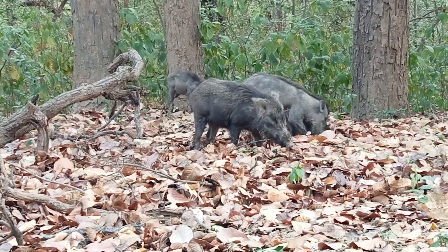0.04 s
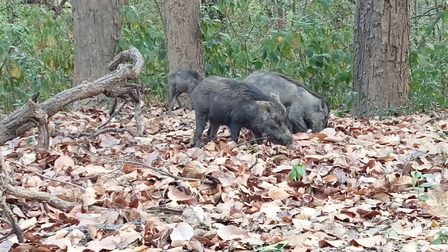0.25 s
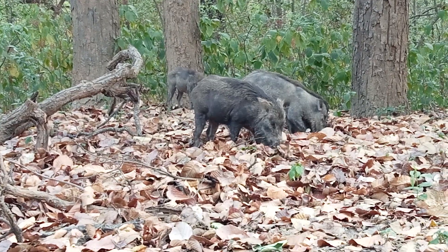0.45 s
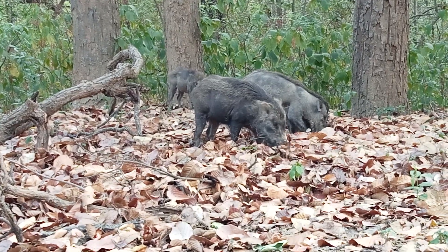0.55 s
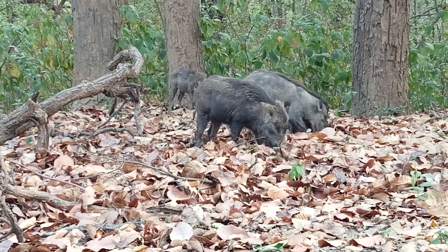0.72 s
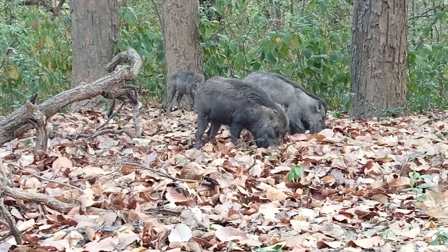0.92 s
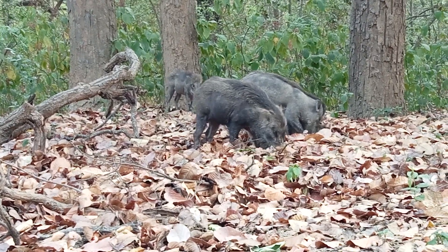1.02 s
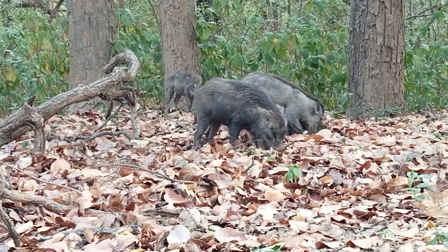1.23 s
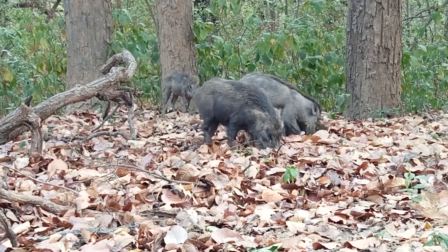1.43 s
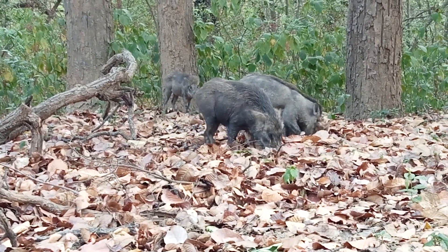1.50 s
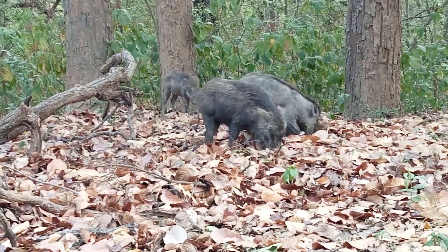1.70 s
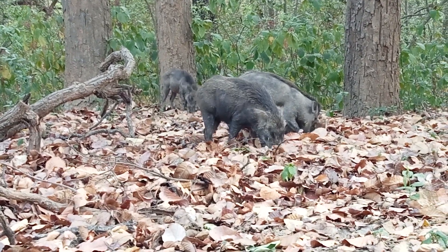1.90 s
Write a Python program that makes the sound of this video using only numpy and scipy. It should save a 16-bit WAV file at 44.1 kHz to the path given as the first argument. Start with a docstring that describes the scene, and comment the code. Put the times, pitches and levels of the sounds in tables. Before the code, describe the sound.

Dry leaves rustle and small twigs snap throughout as wild boars root several metres away, with surges at about 0.5 and 0.9 seconds. From 0.6 seconds one boar whines thinly, then gives a short falling squeal from 1.1 to 1.3. Soft thuds fall at 0.2 and 1.1 seconds. Lighter rustling continues to the end, with very faint distant hoots near the start and around 1.6, over a quiet forest hum.

```python
"""Dry leaves rustle and twigs snap: wild boars are rooting on a forest floor several metres away.
Their snouts shove the litter into bursts of crackle and scuff the soil, and two dull thuds sound.
One boar whines thinly, then gives a short falling squeal, its harmonics shaped by the throat.
Faint far hoots sit over the quiet hum of the forest; trunks and undergrowth add a short tail."""
import sys
import numpy as np
from scipy import signal
from scipy.io import wavfile
from scipy.ndimage import uniform_filter1d

SR = 44100
rng = np.random.default_rng(int(sys.argv[2]) if len(sys.argv) > 2 else 0)


def master_out(mix):
    """Clip the mix to full scale and print it as 16-bit PCM to the path in sys.argv[1]."""
    frames = np.transpose(np.atleast_2d(mix))
    ceiling = np.clip(frames, -1, 1)
    pcm = np.round(ceiling * 32767).astype(np.int16)
    wavfile.write(sys.argv[1], SR, pcm)


N = 85995
T = np.arange(N) / SR


def from_db(db):
    return 10 ** (np.asarray(db) / 20)


def unit_rms(x):
    return x / np.sqrt(np.mean(x ** 2) + 1e-20)


def automation(rows):
    """One curve per column after the time, interpolated at every sample."""
    times, *columns = np.transpose(rows)
    return [np.interp(T, times, column) for column in columns]


def eq_db(points, hz):
    """An EQ curve read on a log-frequency axis."""
    freqs, db = np.transpose(points)
    return np.interp(np.log(hz), np.log(freqs), db)


def drift(rate_hz):
    """A smooth random modulator with an RMS of 1."""
    r = np.exp(-2 * np.pi * rate_hz / SR)
    return unit_rms(signal.lfilter([1], [1, -2 * r, r * r], rng.standard_normal(2 * N))[N:])


def band(x, low, high):
    sos = signal.butter(2, [low, min(high, .48 * SR)], "band", fs=SR, output="sos")
    return signal.sosfilt(sos, x)


def resonate(x, hz, width):
    """A resonant band-pass with unity gain at its peak."""
    r = np.exp(-np.pi * width / SR)
    feedback = [1, -2 * r * np.cos(2 * np.pi * hz / SR), r * r]
    return signal.lfilter(np.array([1, 0, -1]) * (1 - r * r) / 2, feedback, x + 1e-18)


def decay(start, t60):
    """An envelope that jumps to 1, then falls 60 dB every t60 seconds."""
    return (T >= start) * np.exp(-np.log(1000) * np.clip((T - start) / t60, 0, 10))


def attack_decay(start, attack, t60):
    """A linear rise into an exponential fade."""
    top = start + attack
    return np.clip((T - start) / attack, 0, 1) * np.maximum(T < top, decay(top, t60))


def third_octaves():
    """Bands as (low, centre, high) in Hz."""
    edges = 25 * 2 ** (np.arange(29) / 3)
    return list(zip(edges, np.sqrt(edges[:-1] * edges[1:]), edges[1:]))


def leaf_contacts(crackles_per_s=2200, ticks_per_s=70):
    """Two raw textures of leaf on leaf: dense crackle, scattered ticks and a rubbing hiss."""
    triggers = rng.random(N) < crackles_per_s / SR
    crackles = triggers * from_db(np.minimum(rng.exponential(1, N), 4))
    ticks = from_db(15) * (rng.random(N) < ticks_per_s / SR) * rng.standard_normal(N)
    textures = []
    for _ in range(2):
        crackle = unit_rms(woods(crackles * rng.standard_normal(N), wet_db=-3))
        rub = from_db(4.5) * rng.standard_normal(N)
        textures.append(ticks + crackle + rub)
    return textures


# Fader ride of the steadily stirred litter: t/s, level/dB
LITTER_STIR = [(0,-59),(.1,-60.5),(.14,-56),(.25,-53.5),(.3,-60.5),(.38,-59.5),(.45,-51.5),(.62,-55),(.72,-49.5),(.81,-49),(.85,-46),(.89,-42.5),(.95,-43),(1.07,-52),(1.17,-51),(1.29,-56),(1.4,-56),(1.68,-54.5),(1.85,-57.5),(1.95,-63)]
# Quick shoves of a snout or hoof: t/s, level/dB, T60/s, tilt/(dB per octave)
SNOUT_SHOVES = [(0.153,-55.5,0.048,0),(0.399,-49,0.074,1.5),(0.419,-47,0.16,-2.5),(0.5,-42.5,0.25,1.4),(.885,-44.5,0.41,2),(1.426,-52,0.34,0),(1.465,-49,0.17,-2),(1.51,-61.5,0.089,-11),(1.636,-53,0.47,-2.5)]
# Tone of the dry leaves: f/Hz, gain/dB
LEAF_EQ = [(150,-7),(400,-6),(700,-7),(950,-9.5),(1500,-6.5),(2200,-3.5),(3300,-0.5),(4600,-1.5),(6600,0),(8200,-14),(10000,-19.5),(13500,-19.5),(16000,-15.5)]
# Narrow resonances in the rustle: f/Hz, width/Hz, boost/dB
LEAF_RESONANCES = [(774,94,4.5),(1523,53,8),(1992,145,8),(2477,48,8.5),(2755,73,7.5),(3316,25.5,8),(4577,88,9),(6830,81,8.5)]


def rustle(attack_s=0.012, tilt_pivot_hz=4400, flicker_db=0.61):
    """Dry leaves crackle and rub as they are stirred, surging with each shove."""
    contacts = leaf_contacts()
    stir = from_db(automation(LITTER_STIR)[0])
    shoves = [(from_db(db) * attack_decay(start, attack_s, t60), tilt)
              for start, db, t60, tilt in SNOUT_SHOVES]
    shared_flicker = drift(21)
    shaped, steady = 0, 0
    for k, (low, hz, high) in enumerate(third_octaves()[7:], start=7):  # from 126 Hz up
        flicker = flicker_db * (shared_flicker + drift(27)) / np.sqrt(2)
        grain = band(contacts[k % 2], low, high) * from_db(eq_db(LEAF_EQ, hz) + flicker)
        octaves = np.clip(np.log2(hz / tilt_pivot_hz), -1, 2)
        power = stir ** 2 + sum((push * from_db(tilt * octaves)) ** 2 for push, tilt in shoves)
        shaped += grain * np.sqrt(power)
        steady += grain
    leaves = shaped / np.std(steady)
    ring = sum((from_db(db) - 1) * resonate(leaves, hz, width) for hz, width, db in LEAF_RESONANCES)
    return from_db(-2.5) * (leaves + ring)


# Leaves and twigs breaking: t/s, peak/dB, f/Hz, width/Hz, T60/s
TWIG_SNAPS = [(.107,-51,2730,2000,.013),(0.16,-45,3000,5050,0.018),(.228,-49,5070,4000,.013),(.401,-33,4140,3970,0.014),(.421,-41,5400,3980,0.015),(.426,-42,4440,3800,.012),(0.444,-54,2500,2400,0.008),(0.7533,-39.5,14100,2300,0.0039),(.7537,-36,3300,4000,.012),(0.794,-42,2520,1500,.005),(.7955,-49,14300,2420,0.0035),(0.846,-32,4330,3000,0.015),(.895,-31,5200,4000,.006),(1.2159,-33,5640,2320,0.0077),(1.225,-48,5770,2400,0.01),(1.329,-47,4400,3020,0.011),(1.448,-45,3800,4000,0.0071),(1.469,-38.5,3030,4040,0.015),(1.479,-45,3500,4000,0.011),(1.487,-52,5000,4000,0.004),(1.516,-43,3960,4000,.013),(1.596,-46,2800,2000,0.0065),(1.642,-41,2390,1600,0.013),(1.668,-40,2500,1980,0.0053)]


def snaps():
    """Each break is a brief crack that rings around one pitch, with a small crumbling tail."""
    out = 0
    for start, db, hz, width, t60 in TWIG_SNAPS:
        crumble = from_db(-22) * decay(start, t60=.045)
        burst = rng.choice([-1, 1], N) * (decay(start, t60) + crumble)
        ring = resonate(resonate(burst, hz, width), hz, width)
        crack = unit_rms(ring) + from_db(-24) * unit_rms(burst)
        out += from_db(db) * crack / np.max(np.abs(crack))
    return out


# Contour of the squeal: t/s, f/Hz, level/dB, roughness/(0-1), tilt/(dB per octave)
SQUEAL_CONTOUR = [(1.078,1359,-68,0,7),(1.1,1316,-53.5,0.2,3),(1.109,1277,-42,0,1),(1.126,1280,-37,0.02,0),(1.14,1249,-31,0,-3),(1.156,1218,-36.5,0.08,-1),(1.168,1199,-63,0.54,13.5),(1.177,1191,-41.5,0.17,-0.5),(1.2,1162,-42,0.12,-6.5),(1.235,1114,-51,0.04,1.5),(1.265,1047,-69,0.1,-1)]
# Formants of the boar's throat: f/Hz, gain/dB
THROAT_EQ = [(1100,-11.5),(1270,-11),(2400,-14),(2600,-18.5),(3450,-8.5),(3820,-0.5),(4600,-15),(5100,-30),(5900,-31),(6400,-11.5),(7200,-28.5),(7700,-28),(8200,-41)]
# Breathy rasp in the throat: f/Hz, width/Hz, level/dB
RASP_BANDS = [(2770,230,0),(3680,220,0),(4600,700,-3)]


def squeal(jitter=0.00308, rasp_rate_hz=267):
    """A falling cry: six harmonics coloured by the throat, fraying into rasp in places."""
    pitch, db, roughness, tilt = automation(SQUEAL_CONTOUR)
    phase = 2 * np.pi * np.cumsum(pitch * (1 + jitter * drift(87))) / SR
    phase += 0.39 * roughness * drift(rasp_rate_hz)
    voice = sum(from_db(eq_db(THROAT_EQ, k * pitch) + tilt * np.log2(k)) * np.sin(k * phase)
                for k in np.arange(1, 7))
    rasp = sum(from_db(level) * unit_rms(band(rng.standard_normal(N), hz - width / 2, hz + width / 2))
               for hz, width, level in RASP_BANDS)
    gate = (T > SQUEAL_CONTOUR[0][0]) & (T < SQUEAL_CONTOUR[-1][0])
    return (np.sqrt(2) * voice + roughness * rasp) * from_db(db) * gate


def gliding_notes(rows, jitter, hoarseness, halo_hz=260):
    """Sine glides that swell and fade, made hoarse by a halo of noise around the pitch."""
    out = 0
    for start, length, start_hz, end_hz, db in rows:
        pitch = np.interp(T, [start, start + length], [start_hz, end_hz]) * (1 + jitter * drift(153))
        swell = np.sin(np.pi * np.clip((T - start) / length, 0, 1))
        phase = 2 * np.pi * np.cumsum(pitch) / SR
        halo = drift(halo_hz) * np.sin(phase) + drift(halo_hz) * np.cos(phase)
        out += swell * from_db(db) * (np.sin(phase) + hoarseness * halo)
    return out


# The boar's whines and chirps: t/s, length/s, start f/Hz, end f/Hz, level/dB
WHINE_NOTES = [(.627,0.036,3950,4040,-55),(.654,0.02,5600,4800,-56),(.668,0.054,4330,4550,-50),(.73,0.067,5180,5060,-51.5),(.765,0.095,3720,3850,-52),(.795,0.04,4970,5620,-48.5),(.818,0.089,4470,4500,-43.5),(.94,0.12,4530,4300,-45),(1.015,0.037,4140,3910,-48),(1.078,0.036,5600,5070,-52),(1.152,.018,4030,4070,-46.5),(1.168,0.019,4100,4080,-47.5),(1.169,0.017,4650,4800,-49),(1.181,0.018,4700,4550,-50)]


def whines():
    """Thin, hoarse notes from the boar lead into the squeal and overlap it."""
    return gliding_notes(WHINE_NOTES, jitter=0.00472, hoarseness=.55)


# Dull thuds: t/s, level before the filter/dB
THUD_HITS = [(0.2112,-43),(1.1064,-41)]


def thuds(start_hz=513, end_hz=92.6, fall_s=0.00578):
    """Soft knocks whose pitch drops within milliseconds to a low ring."""
    out = 0
    for start, db in THUD_HITS:
        age = np.maximum(T - start, 0)
        pitch = end_hz + (start_hz - end_hz) / (1 + (age / fall_s) ** 4)
        phase = 2 * np.pi * np.cumsum(pitch * (age > 0)) / SR
        out += from_db(db) * attack_decay(start, attack=0.0017, t60=0.11) * np.sin(phase)
    return band(out, 53, 565)


# Low scuffs in the soil: centre t/s, level/dB, length/s
SOIL_SCUFFS = [(.0,-64,0.035),(0.178,-64,0.07),(0.23,-63.5,0.044),(0.516,-61,0.08),(1,-58.5,0.0093),(1.08,-59.5,0.067),(1.158,-55.5,0.048),(1.293,-67,.025),(1.46,-73,0.076),(1.57,-63.5,0.1),(1.685,-68,0.032)]


def scuffs(hz=109, width_hz=68):
    """Soil being pushed about gives soft swells of rumble."""
    swell = sum(from_db(db) * np.exp(-2 * ((T - centre) / length) ** 2)
                for centre, db, length in SOIL_SCUFFS)
    rumble = resonate(resonate(rng.standard_normal(N + SR), hz, width_hz), hz, width_hz)[SR:]
    running_rms = np.sqrt(uniform_filter1d(rumble ** 2, size=1800))
    return swell * rumble / running_rms


# Far hoots: t/s, length/s, start f/Hz, end f/Hz, level/dB
HOOT_NOTES = [(.045,0.03,820,846,-67),(.11,0.04,854,827,-64.5),(1.53,0.11,912,943,-62),(1.625,0.13,1034,980,-65.5)]


def hoots():
    """Two faint pairs of slightly breathy notes in the distance."""
    return gliding_notes(HOOT_NOTES, jitter=0.0079, hoarseness=0.34)


# Tone of the forest bed: f/Hz, gain/dB
FOREST_EQ = [(25,-73),(45,-13),(70,5),(120,-1),(200,5.5),(400,-4),(800,-11),(2000,-0.5),(5000,-38.5),(10000,-24),(16000,-28)]


def forest(level_db=-67.5):
    """A quiet, even bed of noise, strongest in the bass."""
    air = sum(from_db(eq_db(FOREST_EQ, hz)) * band(rng.standard_normal(N + SR // 2), low, high)[-N:]
              for low, hz, high in third_octaves())
    return from_db(level_db) * unit_rms(air)


def woods(x, wet_db):
    """Trunks and undergrowth scatter a short diffuse tail behind the direct sound."""
    tail = rng.standard_normal(N) * decay(0.0046, t60=0.085)
    tail /= np.sqrt(np.sum(tail ** 2))
    return x + from_db(wet_db) * signal.fftconvolve(x, tail)[:N]


def scene():
    """The mono mix, with the calls and snaps sent to the woodland reverb."""
    calls = squeal() + whines() + hoots()
    mix = rustle() + woods(calls, wet_db=-9) + woods(snaps(), wet_db=-12)
    return (mix + thuds() + scuffs() + forest())[None]


def record(dry):
    """A steep high cut takes off the very top."""
    cutoff_hz = 15650
    return signal.sosfilt(signal.ellip(12, .1, 70, cutoff_hz, fs=SR, output="sos"), dry)


dry = scene()
out = record(dry)
master_out(out)
```